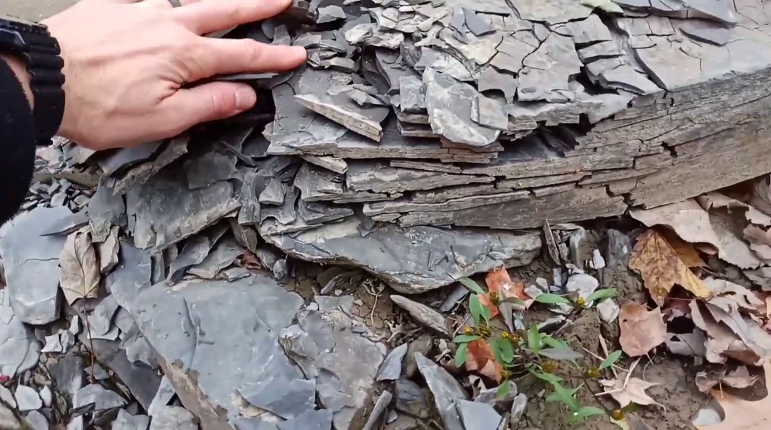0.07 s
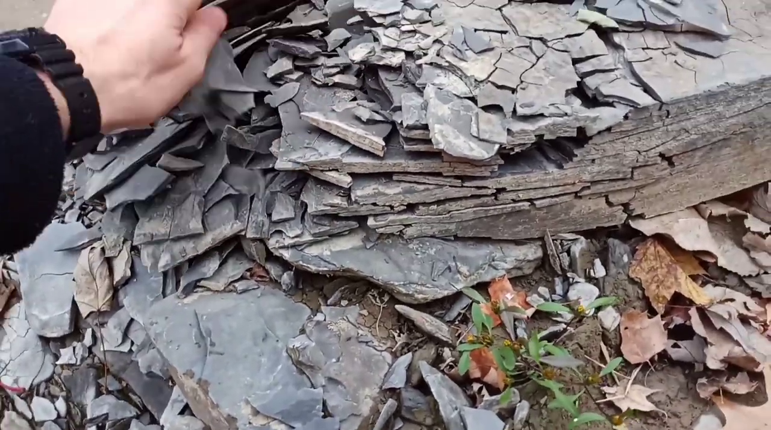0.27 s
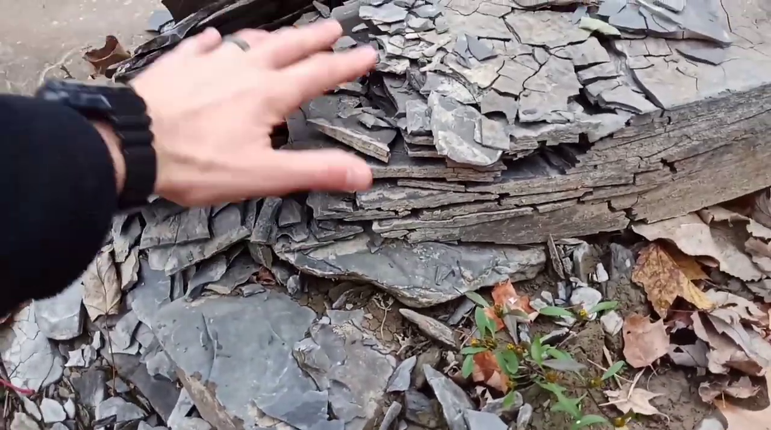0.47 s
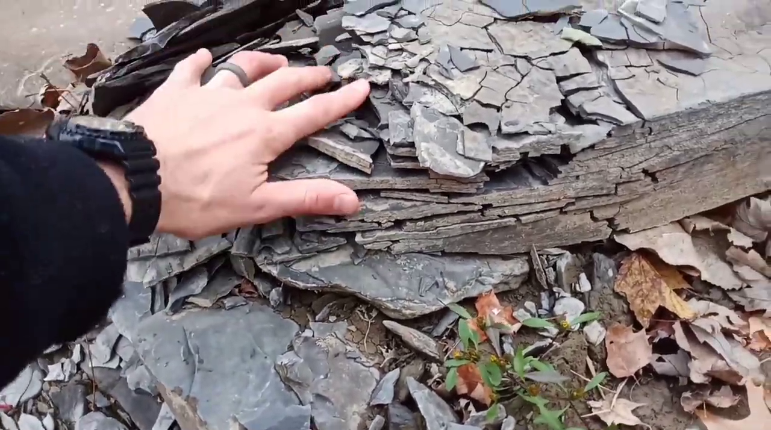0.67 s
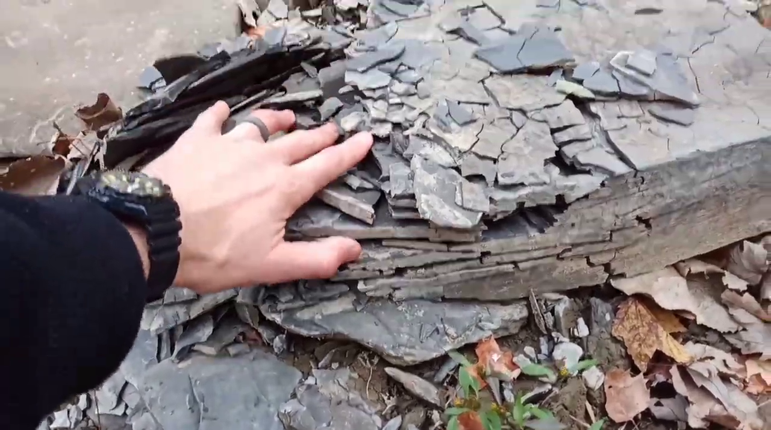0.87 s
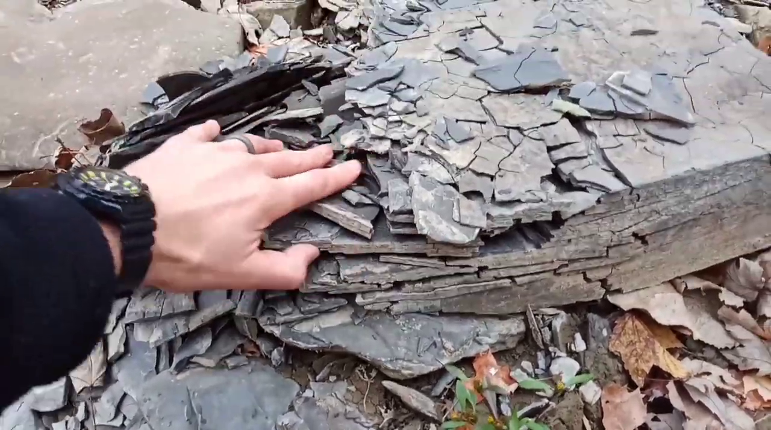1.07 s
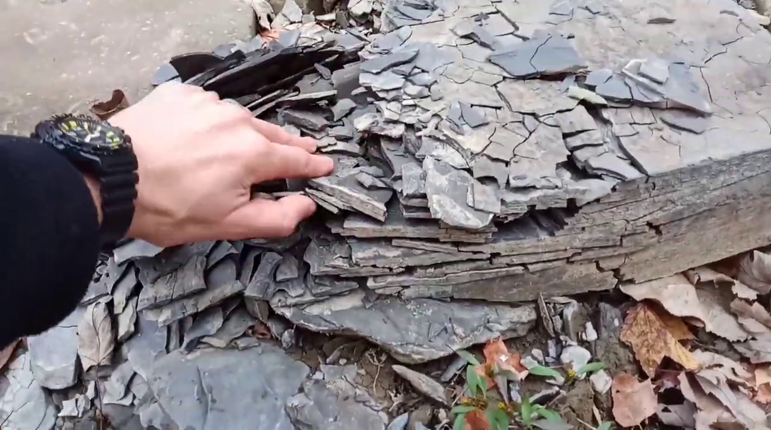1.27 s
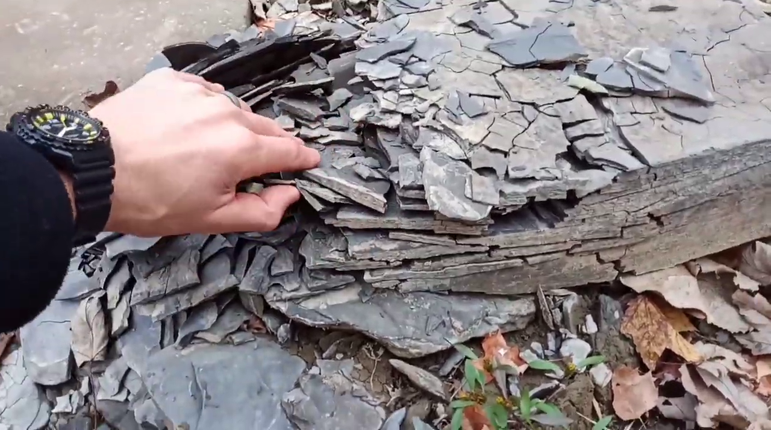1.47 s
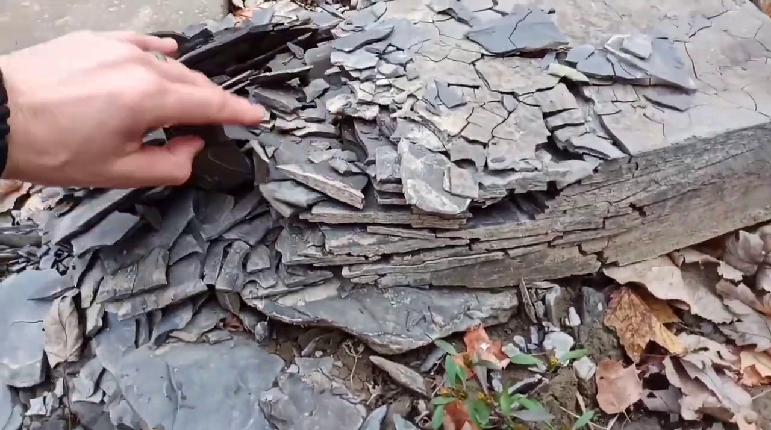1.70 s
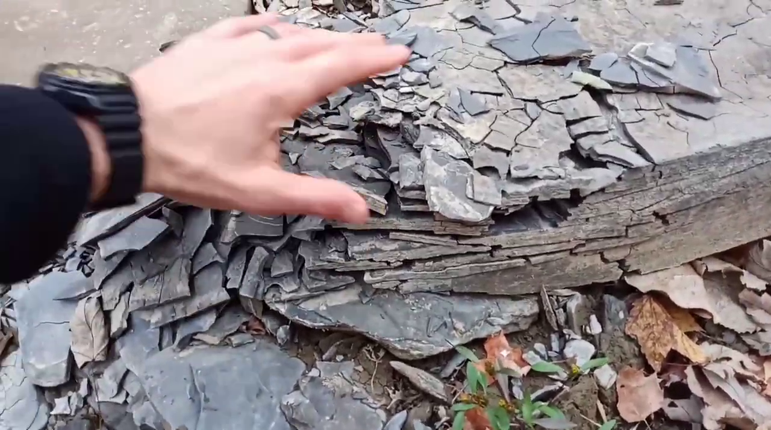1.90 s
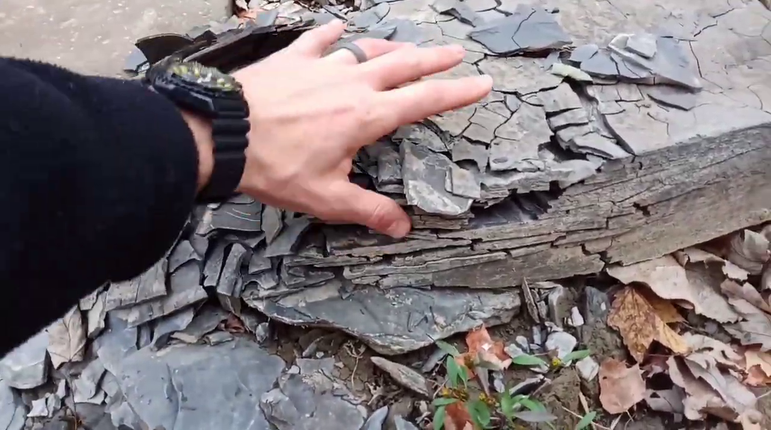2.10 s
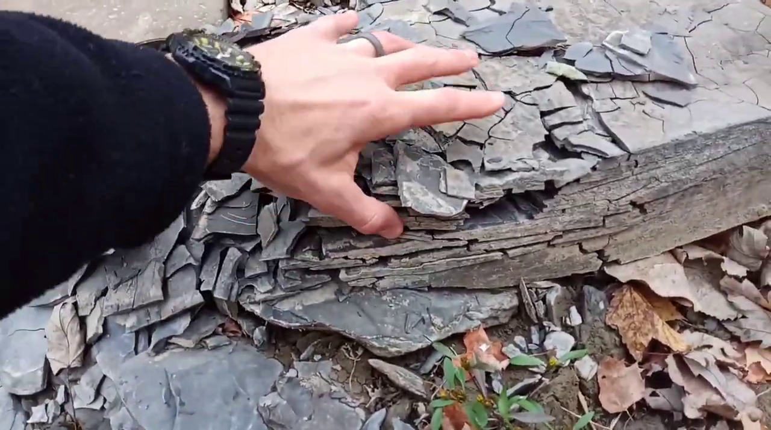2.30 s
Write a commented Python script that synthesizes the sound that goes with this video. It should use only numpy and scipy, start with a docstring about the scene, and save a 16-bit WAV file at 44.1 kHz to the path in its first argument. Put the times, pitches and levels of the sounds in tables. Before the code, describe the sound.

Brittle shale flakes slide and clatter as a hand shifts them close to the microphone. After a lull they snap again, then one piece drags out with a soft scrape, amid microphone bumps and quiet outdoor air.

```python
"""At a shale outcrop, a hand shifts loose flakes close to the microphone.
The flakes slide over each other in a gritty rush, click, snap and briefly ring, and fingers brush the stone.
One piece is dragged out with a soft scrape, friction exciting its resonances.
The hand-held microphone rumbles and bumps, mostly in the second half, over quiet outdoor air."""
import sys
import numpy as np
from scipy import signal
from scipy.fft import rfft, irfft, next_fast_len
from scipy.io import wavfile
from scipy.ndimage import map_coordinates

SR = 44100
rng = np.random.default_rng(int(sys.argv[2]) if len(sys.argv) > 2 else 0)


def inscribe(sig):
    """Save sig as 16-bit PCM at rate SR to the path in sys.argv[1].

    A 1-D sig is mono; a 2-D sig holds one channel per row.
    Samples are clipped to [-1, 1] before scaling.
    """
    pcm = np.round(np.clip(np.atleast_2d(sig).T, -1, 1) * 32767)
    wavfile.write(sys.argv[1], SR, pcm.astype(np.int16))


N = 108045

# Tone of the outdoor air: frequency_hz, gain_db
AIR_EQ = [(40, -15.5), (120, 8.5), (300, -3), (550, -9), (850, -3), (1100, -10.5), (1600, -12.5),
          (2400, -20), (6000, -24.5), (8300, -32.5), (10500, -25), (13200, -31), (15200, -23.5)]
# Fader ride of the microphone rumble: time_s, level_db
RUMBLE_FADER = [(0, -62.5), (.15, -69.5), (.27, -65), (.30, -59), (.38, -70), (.5, -65.5), (.62, -69.5),
                (.70, -63.5), (.80, -61.5), (.86, -54), (.92, -60), (1.0, -55), (1.14, -66), (1.21, -45.5),
                (1.27, -47.5), (1.35, -40.5), (1.44, -39.5), (1.50, -52.5), (1.545, -37.5), (1.62, -39.5),
                (1.71, -41.5), (1.742, -52), (1.765, -39), (1.84, -40.5), (1.88, -52), (1.96, -41.5),
                (2.02, -46.5), (2.05, -52.5), (2.11, -52.5), (2.135, -38.5), (2.19, -53.5), (2.245, -48.5),
                (2.27, -67), (2.45, -62.5)]
# Tone of the rumble: frequency_hz, gain_db
RUMBLE_EQ = [(12, -28), (20, -28.5), (64, 2), (117, -0.5), (173, -8.5), (204, -10.5), (328, -29),
             (435, -40), (497, -35), (700, -59), (910, -46), (1540, -120)]
# Fader ride of the sliding rubble: time_s, level_db
SLIDE_FADER = [(0, -57), (.06, -59.5), (.11, -65), (.125, -49.5), (.18, -54.5), (.215, -45), (.30, -46),
               (.35, -47), (.385, -55), (.41, -60), (.45, -65), (.53, -76.5), (.58, -75), (.68, -75.5),
               (.88, -76.5), (.95, -70.5), (1.03, -70.5), (1.08, -55.5), (1.115, -53), (1.14, -57.5),
               (1.19, -61), (1.222, -67), (1.24, -50), (1.265, -61.5), (1.29, -40.5), (1.32, -65.5),
               (1.39, -78.5), (1.68, -65), (1.74, -59), (1.81, -69.5), (1.85, -56), (1.88, -51.5),
               (1.92, -63.5), (1.965, -53.5), (2.0, -71.5), (2.13, -74.5), (2.2, -79)]
# Tone of the rubble: frequency_hz, gain_db
SLIDE_EQ = [(120, -74), (200, -1), (334, 7.5), (491, -7), (867, 0.5), (1040, -15), (1300, 4), (1910, -5),
            (2130, 0.5), (2330, -6), (3560, -1.5), (4350, -0.5), (5840, -2.5), (6760, -0.5), (7800, -17),
            (10700, -1), (12800, -18), (14000, -11), (15200, 0.5), (16000, -22)]
# Finger strokes over the stone: crest_s, half_length_s, level_db
FINGER_STROKES = [(0.012, 0.082, -62.5), (0.5, 0.038, -77), (0.602, 0.022, -75), (0.656, 0.022, -70),
                  (1.068, 0.034, -61.5), (1.192, 0.017, -68)]
# Tone of skin on stone: frequency_hz, gain_db
SKIN_EQ = [(1000, -10), (4000, -13), (7000, -6), (8500, -8), (10500, 7), (13000, -19), (15200, 1),
           (16000, -17)]
# Flakes striking or snapping, before the trims and life shares below:
# start_s, knock_db, clack_db, crack_db, fizz_db, ring_hz, ring_db, base_life_s
FLAKE_HITS = [(0.027, -50, -44, -43, -52, 10300, -47.5, 0.0045),
              (0.1212, -43, -63, -47, -68, 1820, -46, 0.031), (0.136, -51, -44, -64, -74, 8770, -48, 0.023),
              (0.1419, -52, -69, -71.5, -73, 3700, -54, 0.039),
              (0.155, -62, -39, -78, -71.5, 1520, -47, 0.013),
              (0.162, -44, -45, -74, -76, 5570, -48.5, 0.05),
              (0.2145, -65, -35, -34.5, -60, 15170, -57, 0.042),
              (0.2165, -33.5, -55, -28, -53, 15400, -31, 0.0076),
              (0.298, -62.5, -33.5, -47, -54, 1630, -50, 0.037),
              (0.3061, -36, -29, -37, -52.5, 1440, -36, 0.0094),
              (0.3124, -52, -24, -21, -21, 15600, -14.5, 0.0083),
              (0.3242, -37.5, -32.5, -32, -49, 5750, -37, 0.021),
              (0.375, -46.5, -39, -39, -56, 3930, -46.5, 0.042),
              (0.3895, -48, -36, -38, -42, 9420, -39, 0.027),
              (0.397, -72, -32.5, -29.5, -41, 9600, -40, 0.025),
              (0.4349, -54.5, -60, -55, -90, 3620, -48, 0.05),
              (0.457, -67, -62, -69, -47, 9560, -55, 0.016),
              (0.5643, -64, -59, -45, -46, 4440, -56.5, 0.027),
              (0.5672, -73, -47.5, -49.5, -67, 4400, -55, 0.02),
              (0.9233, -56.5, -57, -78, -84, 1580, -63.5, 0.067),
              (0.9897, -51, -47, -41, -46, 5500, -48, 0.021),
              (1.0665, -72, -49, -50, -59, 10400, -52, 0.025),
              (1.0949, -65, -44, -38, -50, 4570, -53, 0.015),
              (1.0991, -54, -34, -31.5, -34, 4490, -38.5, 0.023),
              (1.1115, -43, -42, -37, -40, 3930, -44, 0.024),
              (1.1405, -49.5, -68, -82, -72, 1510, -44, 0.038),
              (1.2256, -67, -65, -47, -60, 9000, -68, 0.016),
              (1.2315, -51, -42.5, -47, -57, 15000, -53, 0.08),
              (1.245, -68, -39, -48.5, -37, 9630, -55, 0.031),
              (1.25, -51.5, -50, -49, -51, 9500, -40, 0.013),
              (1.2745, -44, -30, -31.5, -39, 8800, -56, 0.08),
              (1.2795, -49, -26.5, -18, -23.5, 9540, -30, 0.014),
              (1.289, -66, -34, -26, -51, 8790, -37, 0.011),
              (1.2984, -45, -28, -31, -35, 1370, -45.5, 0.03),
              (1.733, -53, -41, -43, -48, 10790, -43, 0.053),
              (1.8473, -39.5, -33.5, -56, -45, 5370, -34.5, 0.019),
              (1.8729, -38.5, -36, -60, -52, 7040, -46, 0.011),
              (1.8996, -72, -48, -54, -63, 6500, -47, 0.02), (1.941, -51, -42, -65, -56, 3870, -42, 0.019),
              (1.9598, -52, -40.5, -78.5, -75, 3930, -44, 0.011),
              (1.978, -51, -39.5, -61.5, -67, 4090, -47.5, 0.021),
              (2.017, -61, -56, -50.5, -79, 4100, -54, 0.015),
              (2.0856, -72, -58, -59.5, -63, 6040, -61, 0.02),
              (2.118, -66, -70, -65, -62, 3520, -66, 0.038), (2.336, -82, -65, -62, -66, 6500, -78, 0.029),
              (2.356, -82, -64, -62, -72, 4500, -88, 0.026),
              (2.379, -61.5, -57, -59.5, -55, 10280, -59.5, 0.017)]
# The knock, clack, crack and fizz bands of a hit: low_hz, high_hz
HIT_BANDS = [(1230, 2250), (2600, 7000), (7000, 11600), (13800, 16000)]
# Dull bumps on the microphone, plus one low thud of the rubble's body at 0.331 s: start_s, envelope_peak_db,
# pitch_hz
LOW_THUDS = [(0.288, -56, 76.5), (.331, -49, 312), (0.852, -44, 82), (1.286, -29, 104), (1.344, -34, 125),
             (1.422, -34, 90), (1.532, -30, 83.3), (1.686, -30.5, 144), (1.69, -44, 377),
             (1.769, -38.5, 200), (1.798, -35, 242), (1.816, -36, 81), (2.005, -43.5, 77.7),
             (2.123, -41.5, 129), (2.187, -50.5, 280)]
# The move of the dragged piece: time_s, level_db, rub_hz
DRAG_MOVE = [(1.27, -120, 7230), (1.32, -83, 7165), (1.35, -59, 6556), (1.39, -78.5, 4580),
             (1.42, -61.5, 4300), (1.455, -65.5, 4280), (1.485, -79, 4640), (1.525, -67.5, 5120),
             (1.60, -61, 5190), (1.63, -63.5, 5365), (1.68, -55.5, 6380), (1.725, -56.5, 5870),
             (1.77, -49, 7040), (1.79, -55, 6980), (1.815, -88, 7110), (1.85, -70, 7070), (1.86, -56, 7100),
             (1.90, -78, 6670), (1.95, -77, 6500), (2.0, -100, 6430)]
# Resonances of the dragged piece: pitch_hz, width_hz, gain_db
SLAB_MODES = [(2666, 1100, -3), (4100, 400, 2), (5930, 1000, -2.5), (7090, 280, -1), (8860, 1300, -5.5),
              (9920, 320, -2), (10900, 580, -3.5), (11830, 1300, -6), (15000, 730, 1.5)]

AIR_DB, TOP_HZ = -67, 15550
BRIGHT_HZ, BRIGHT_DB_PER_DB, BRIGHT_PIVOT_DB = 171, 0.19, -42.5  # the rumble's top rides the fader harder
GRAINS_PER_S, CHIPS_PER_S, CHIP_DB, DUST_GAIN = 2500, 800, -4.5, .75
BURST_TRIM_DB, RING_TRIM_DB = -6, 0.5
BURST_LIFE, RING_LIFE = 0.4, 0.44  # shares of a hit's base_life_s
WANDER, SHIMMER_DB = .008, 3.5  # drift of the slab's modes in pitch (share) and level
RASP_DB, RASPS_PER_S = 2.5, 900  # depth and rate of the sticking and slipping


def amp(db):
    """Decibels to gain."""
    return 10 ** (np.asarray(db) / 20)


def unit(x):
    """Scale to rms 1."""
    return x / np.sqrt(np.mean(x ** 2) + 1e-20)


def curve(rows):
    """An automation line, one value per sample, through (time_s, value) points."""
    return np.interp(np.arange(N) / SR, *np.transpose(rows))


def wobble(rate):
    """Smooth random modulation, rate knots a second."""
    return map_coordinates(rng.standard_normal(int(N * rate / SR) + 4), [np.arange(N) * rate / SR])


def filtered(x, response):
    """Filter x with a gain given as a function of frequency."""
    size = next_fast_len(len(x) + 8192)
    return irfft(rfft(x, size) * response(np.fft.rfftfreq(size, 1 / SR)), size)[:len(x)]


def coloured(x, eq):
    """x through an EQ of (frequency_hz, gain_db) points, at rms 1."""
    points_hz, db = np.transpose(eq)
    return unit(filtered(x, lambda hz: amp(np.interp(np.log(hz + 1), np.log(points_hz + 1), db))))


def outdoor_air():
    """A quiet, steady bed of dark noise."""
    return amp(AIR_DB) * coloured(rng.standard_normal(N), AIR_EQ)


def mic_rumble():
    """The hand-held microphone rumbles as the arm moves, brighter when stronger."""
    level_db = curve(RUMBLE_FADER)
    rumble = coloured(rng.standard_normal(N), RUMBLE_EQ)
    lows = filtered(rumble, lambda hz: 1 / (1 + (hz / BRIGHT_HZ) ** 6))
    lift_db = BRIGHT_DB_PER_DB * (level_db - BRIGHT_PIVOT_DB) + 1.4 * wobble(45.08)
    return (lows + (rumble - lows) * amp(lift_db)) * amp(level_db)


def grains(per_s, decay_cycles, top_hz, low_hz=1200, spread_db=3.2):
    """A cloud of tiny collisions, each a damped ping at a random time and pitch, at rms 1."""
    when, pitch, strength = rng.random((int(per_s * N / SR), 3)).T[:, :, None]
    t = np.arange(SR // 40) / SR
    hz = low_hz + (top_hz - low_hz) * pitch
    gain = amp(spread_db * np.minimum(-np.log(1 - strength), 4)) * np.sqrt(hz)  # a few stand out
    pings = gain * np.sin(2 * np.pi * hz * t) * np.exp(-hz * t / decay_cycles) * (1 - t / t[-1])
    at = (when * N).astype(int) + np.arange(len(t))
    return unit(np.bincount(at.ravel(), pings.ravel(), N)[:N])


def sliding_rubble():
    """Countless dry collisions and fewer ringing chips over a hiss of dust."""
    grit = grains(GRAINS_PER_S, decay_cycles=4, top_hz=TOP_HZ)
    dust = DUST_GAIN * rng.standard_normal(N)
    chips = amp(CHIP_DB) * grains(CHIPS_PER_S, decay_cycles=40, top_hz=10000)
    return coloured(grit + dust + chips, SLIDE_EQ) * amp(curve(SLIDE_FADER) + 1.2 * wobble(160))


def finger_brushes():
    """Skin sweeps over the dusty flakes in faint, bright swells."""
    t = np.arange(N) / SR
    swells = sum(amp(db) * np.exp(-((t - crest_s) / half_s) ** 2)
                 for crest_s, half_s, db in FINGER_STROKES)
    return coloured(rng.standard_normal(N), SKIN_EQ) * swells * amp(2.6 * wobble(150))


def crunch(t, decay_s, attack_s=.006, crest_s=.0017, rounding=1.3):
    """Envelope of a hit: grit gives way, rising 60 dB over attack_s and falling 60 dB over decay_s."""
    from_crest = np.maximum((crest_s - t) / attack_s, (t - crest_s) / decay_s)
    return amp(-60 * from_crest ** rounding)


def clink(t, hz, gap_share=.07, neighbour_db=-8):
    """A flake's main mode with three weaker, unevenly spaced neighbours, at rms 1."""
    ring = np.sin(2 * np.pi * hz * t)
    for step in (-1, 1, 2):
        neighbour_hz = hz * (1 + step * gap_share * rng.uniform(0.35, 1))
        ring += amp(neighbour_db) * np.sin(2 * np.pi * (neighbour_hz * t + rng.random()))
    return unit(ring)


def flake_hits(lead_s=.01):
    """Each hit is a burst of crowded, heavily damped modes in four bands, plus the flake's short clink."""
    out = np.zeros(N + SR)
    t = np.arange(SR // 10) / SR - lead_s  # room for the attack
    filters = [signal.butter(5, band, btype="band", fs=SR, output="sos") for band in HIT_BANDS]
    for start_s, *band_db, ring_hz, ring_db, base_life_s in FLAKE_HITS:
        envelope = crunch(t, base_life_s * BURST_LIFE)
        hit = amp(ring_db + RING_TRIM_DB) * crunch(t, base_life_s * RING_LIFE) * clink(t, ring_hz)
        for sos, db in zip(filters, band_db):
            burst = signal.sosfilt(sos, rng.standard_normal(len(t)) * envelope)
            hit += amp(db + BURST_TRIM_DB) * burst * np.linalg.norm(envelope) / np.linalg.norm(burst)
        out[int((start_s - lead_s) * SR):][:len(t)] += hit
    return out[:N]


def rock_scatter(x, t60_s=.075, onset_s=.0083, send_db=-20):
    """A short, weak tail of reflections off the outcrop."""
    t = np.arange(SR // 4) / SR
    tail = rng.standard_normal(len(t)) * amp(-60 * t / t60_s) * (1 - np.exp(-t / onset_s))
    return amp(send_db) * signal.fftconvolve(x, tail / np.linalg.norm(tail))[:N]


def low_thuds(attack_cycles=1.1):
    """Low thuds a few cycles long: soft bumps on the microphone, and one thud of the rubble's body."""
    out, t = np.zeros(N + SR), np.arange(SR // 8) / SR
    for start_s, db, hz in LOW_THUDS:
        age = hz * t / attack_cycles  # 1 at the crest
        envelope = amp(db) * (age * np.exp(1 - age)) ** 2
        out[int(start_s * SR):][:len(t)] += envelope * np.sin(2 * np.pi * (hz * t + rng.random()))
    return out[:N]


def resonance(hz, width_hz):
    """Noise ringing in one resonance whose centre may glide, at rms 1."""
    a, b = (filtered(rng.standard_normal(N), lambda f: 1 / (1 + (1.5 * f / width_hz) ** 2))
            for _ in range(2))
    phase = 2 * np.pi * np.cumsum(hz) / SR
    return unit(a * np.cos(phase) + b * np.sin(phase))


def dragged_slab(rub_db=-1):
    """Friction excites the piece's wandering resonances and one that glides with the point of contact."""
    level_db = curve([(s, db) for s, db, _ in DRAG_MOVE])
    rub_hz = curve([(s, hz) for s, _, hz in DRAG_MOVE])
    body = sum(resonance(hz * (1 + WANDER * wobble(15)), width_hz) * amp(db + SHIMMER_DB * wobble(24.95))
               for hz, width_hz, db in SLAB_MODES)
    rub = amp(rub_db) * resonance(rub_hz * (1 + WANDER * wobble(40)), width_hz=650)
    roughness_db = 1.77 * wobble(120) + RASP_DB * wobble(RASPS_PER_S)
    return unit(unit(body) + rub) * amp(level_db + roughness_db)


def scene():
    """Mono mix of air, handling noise and shale; only the hits feed the rock's reflections."""
    hits = flake_hits()
    shale = sliding_rubble() + finger_brushes() + hits + rock_scatter(hits) + dragged_slab()
    return (outdoor_air() + mic_rumble() + low_thuds() + shale)[None]


def record(dry):
    """A steep high cut on the whole mix."""
    return np.array([filtered(x, lambda hz: 1 / np.sqrt(1 + (hz / TOP_HZ) ** 120)) for x in dry])


dry = scene()
out = record(dry)
inscribe(out)
```